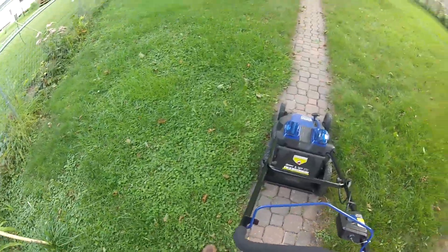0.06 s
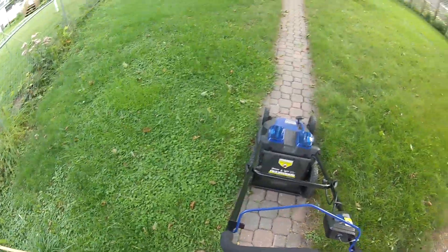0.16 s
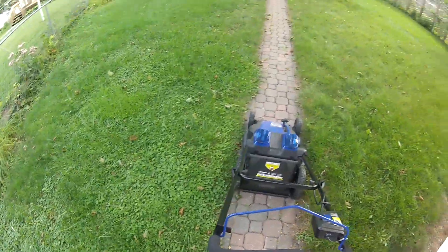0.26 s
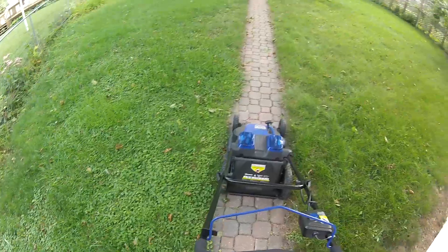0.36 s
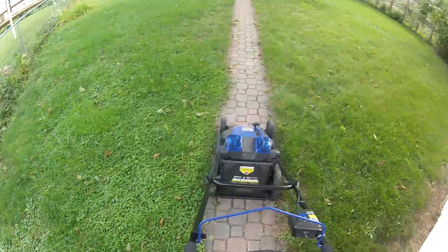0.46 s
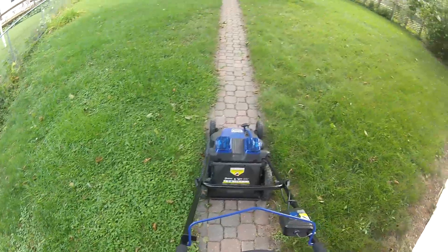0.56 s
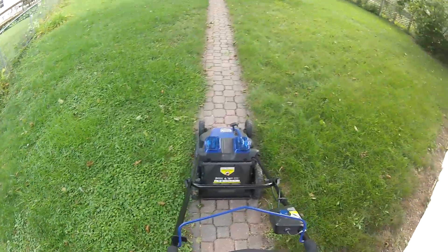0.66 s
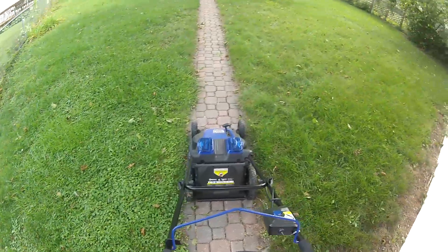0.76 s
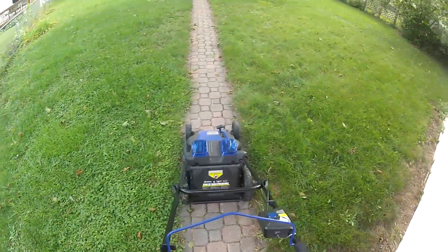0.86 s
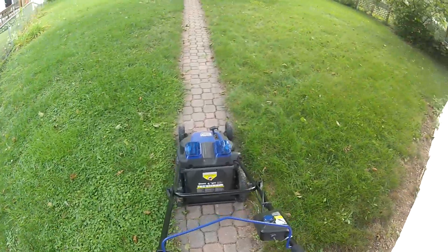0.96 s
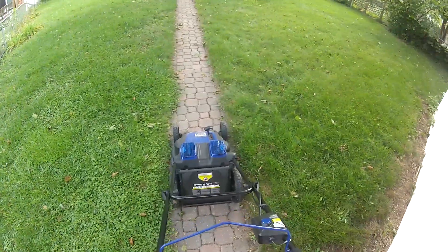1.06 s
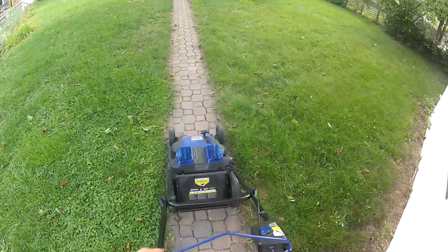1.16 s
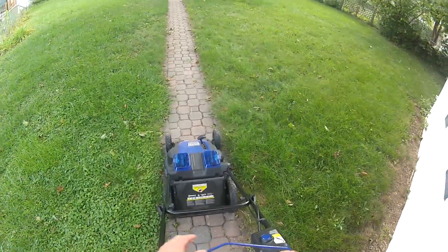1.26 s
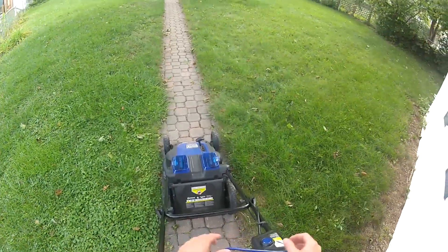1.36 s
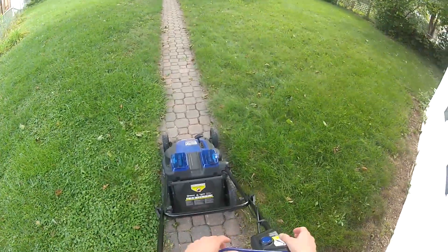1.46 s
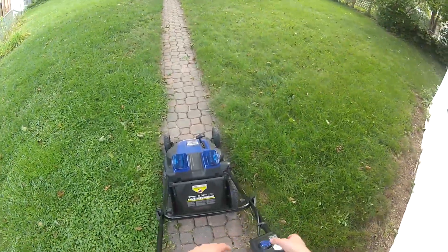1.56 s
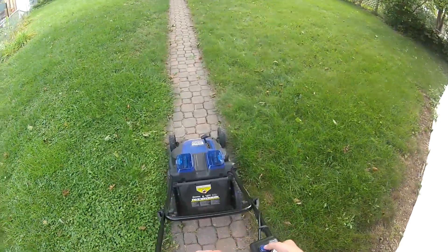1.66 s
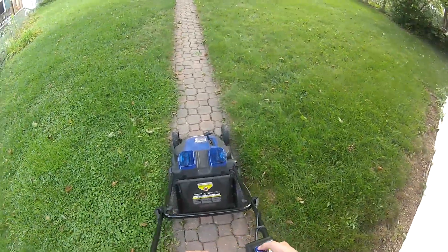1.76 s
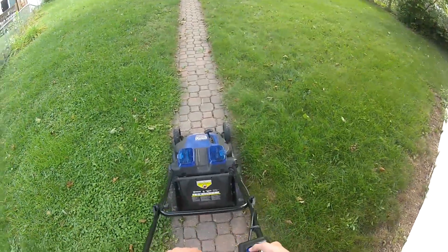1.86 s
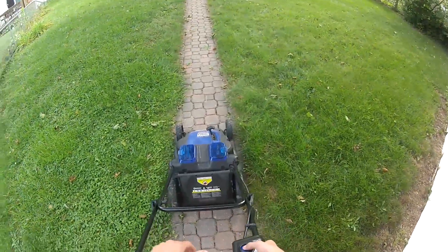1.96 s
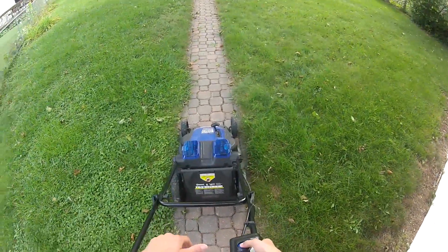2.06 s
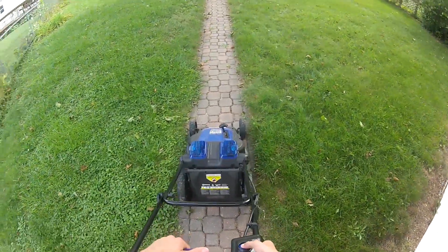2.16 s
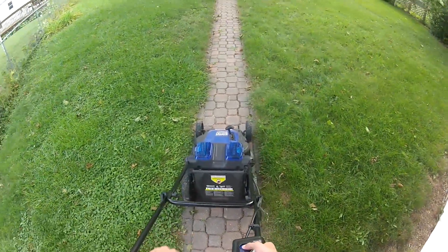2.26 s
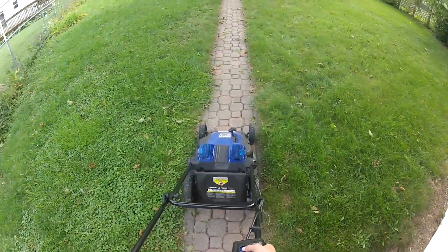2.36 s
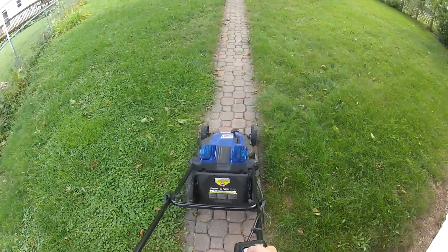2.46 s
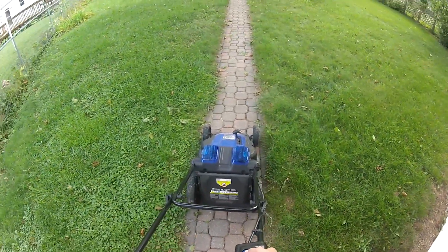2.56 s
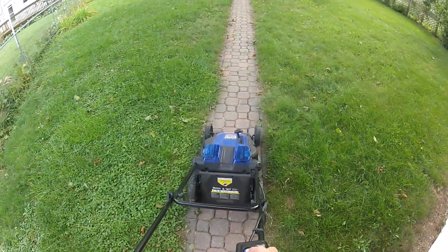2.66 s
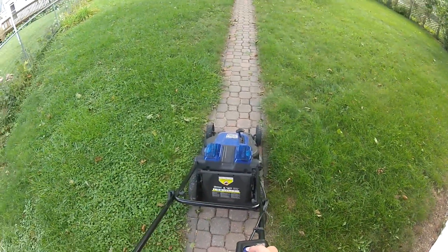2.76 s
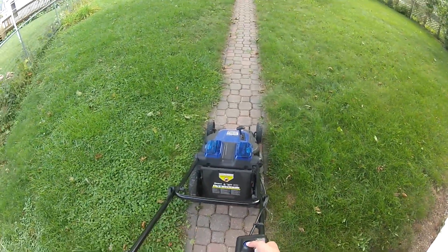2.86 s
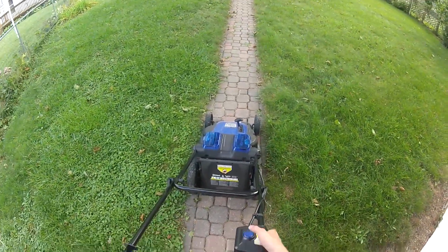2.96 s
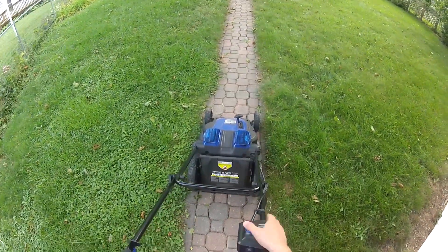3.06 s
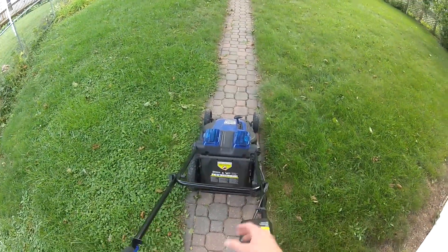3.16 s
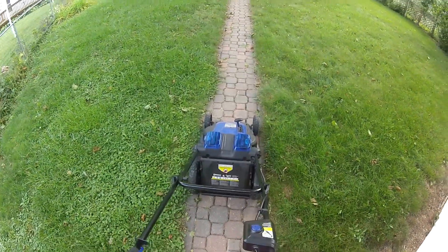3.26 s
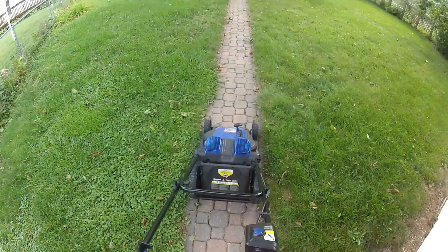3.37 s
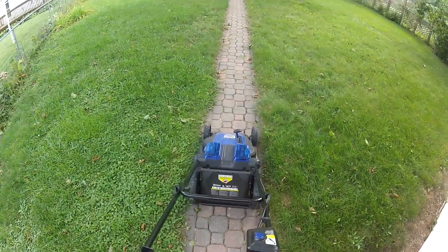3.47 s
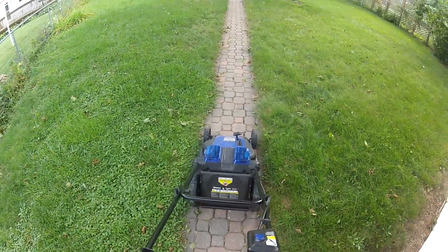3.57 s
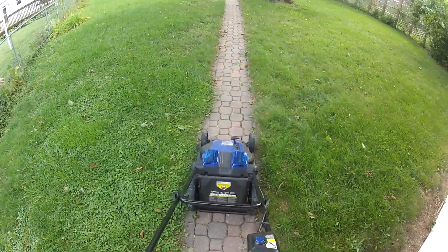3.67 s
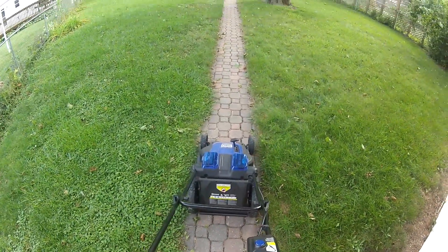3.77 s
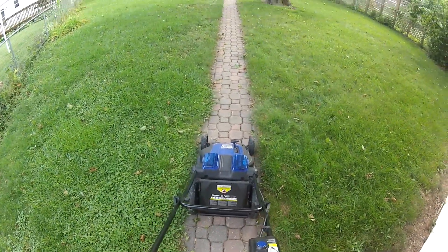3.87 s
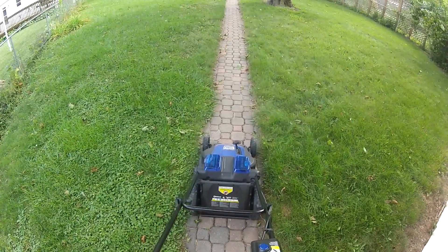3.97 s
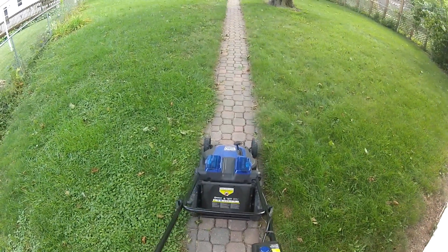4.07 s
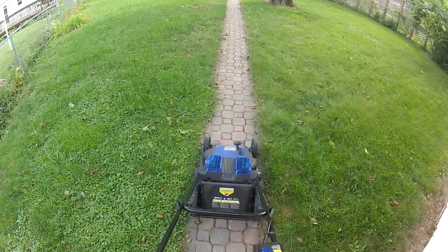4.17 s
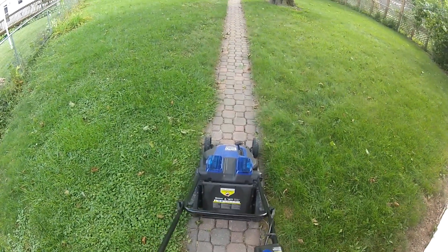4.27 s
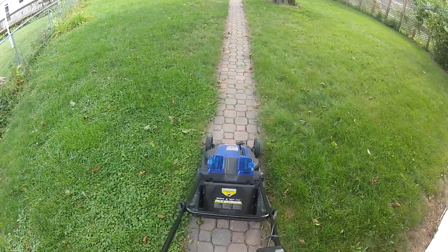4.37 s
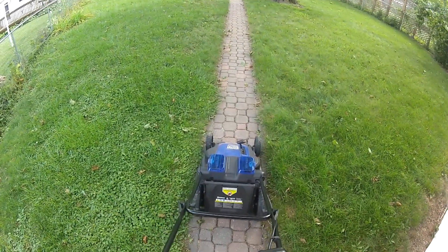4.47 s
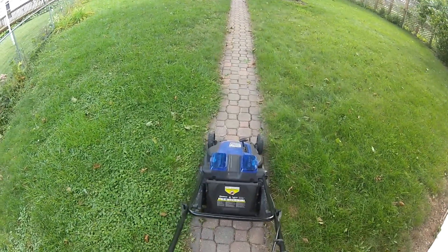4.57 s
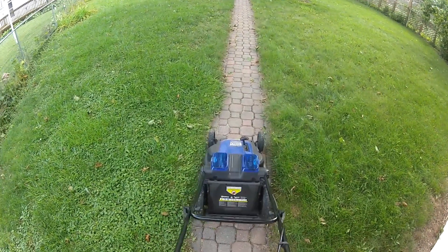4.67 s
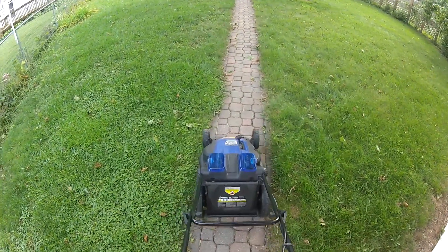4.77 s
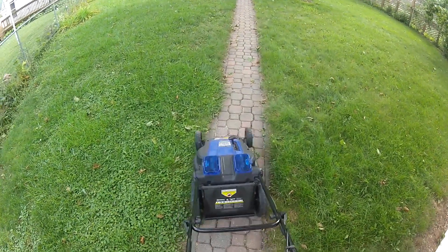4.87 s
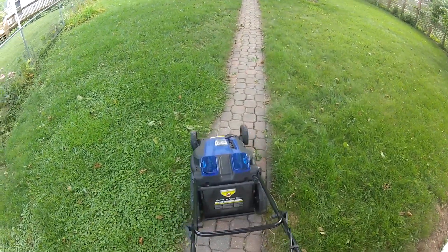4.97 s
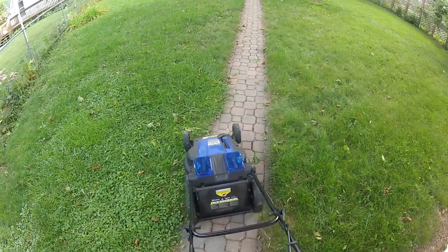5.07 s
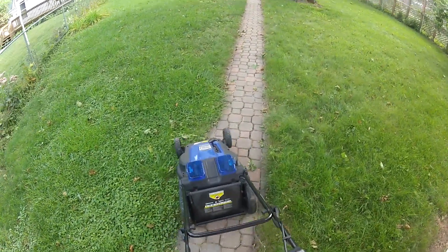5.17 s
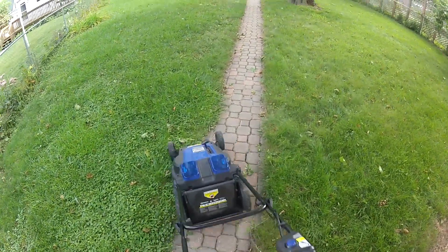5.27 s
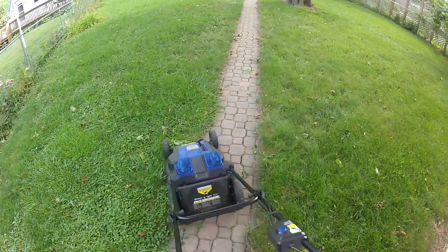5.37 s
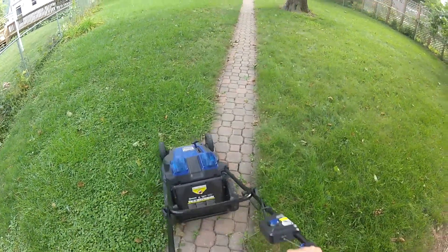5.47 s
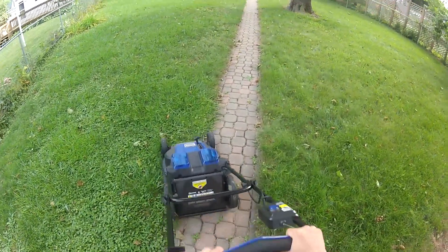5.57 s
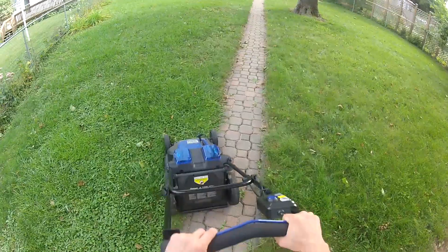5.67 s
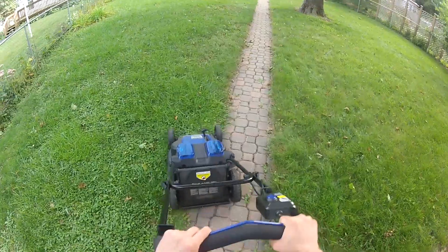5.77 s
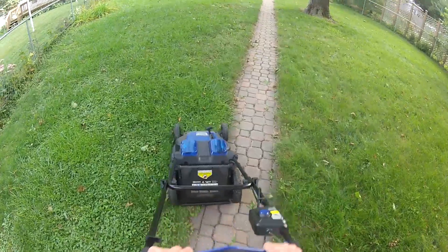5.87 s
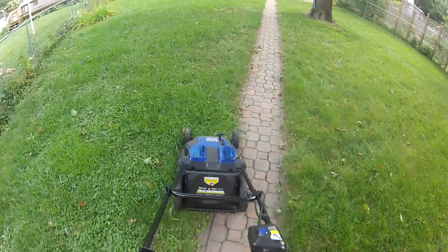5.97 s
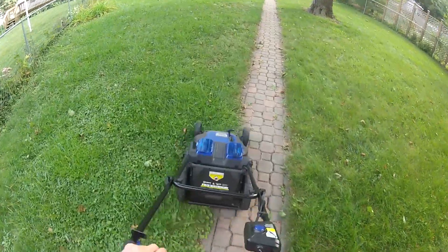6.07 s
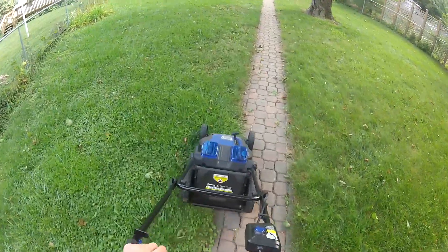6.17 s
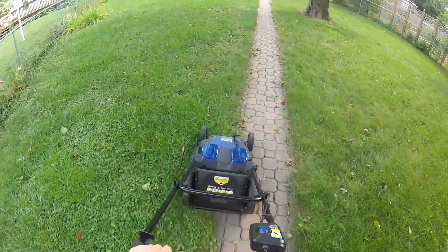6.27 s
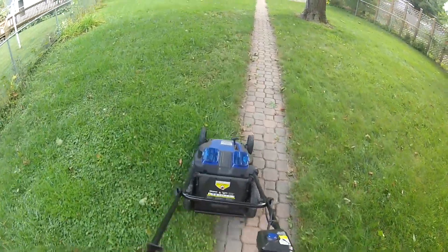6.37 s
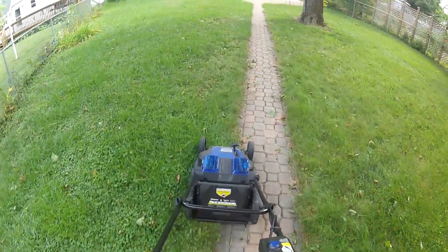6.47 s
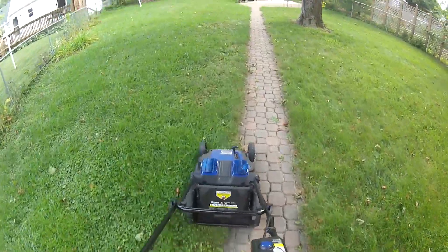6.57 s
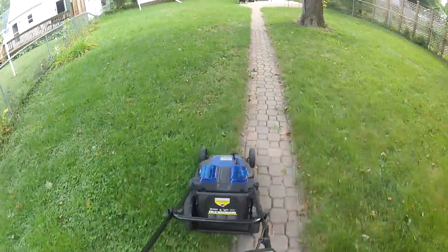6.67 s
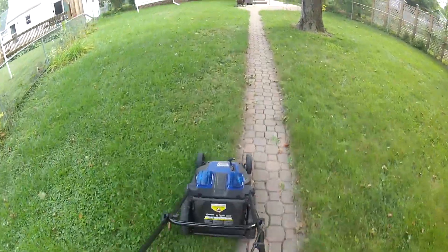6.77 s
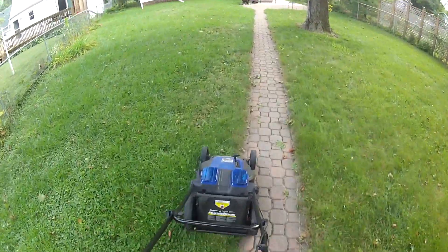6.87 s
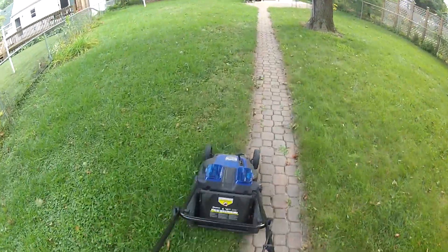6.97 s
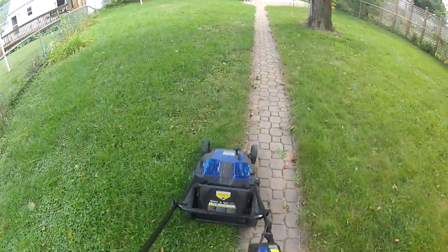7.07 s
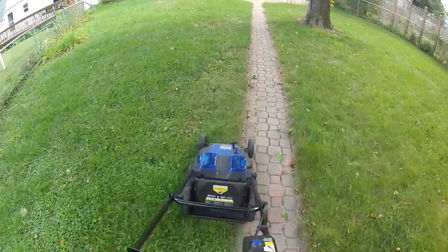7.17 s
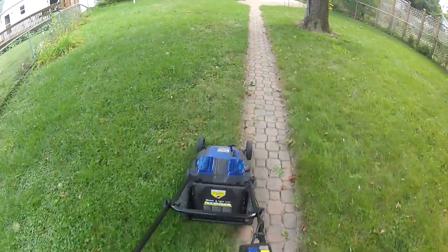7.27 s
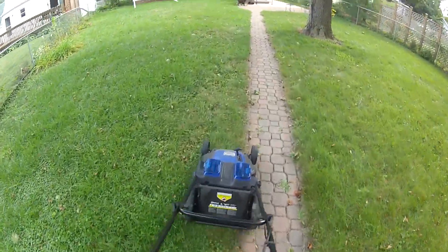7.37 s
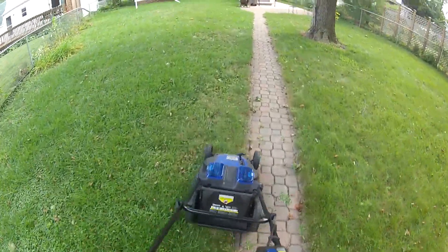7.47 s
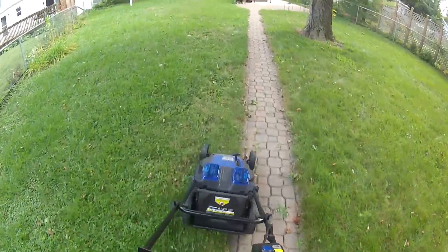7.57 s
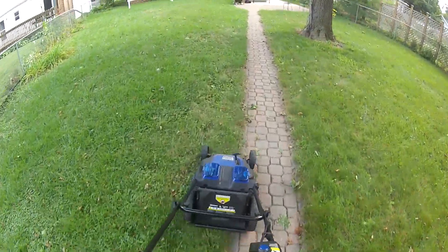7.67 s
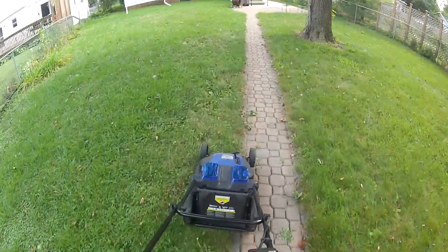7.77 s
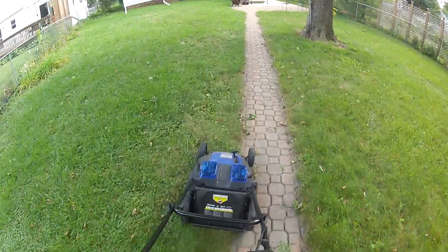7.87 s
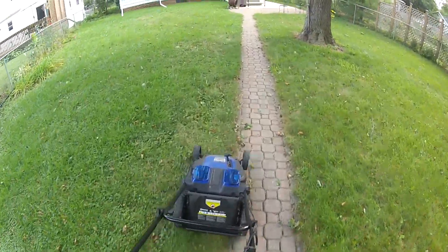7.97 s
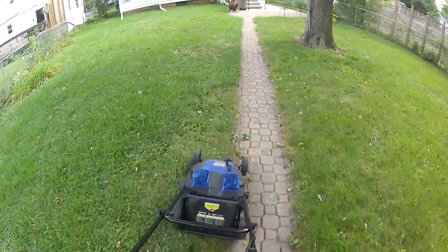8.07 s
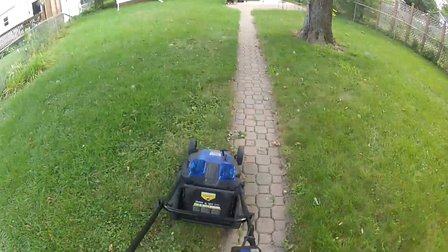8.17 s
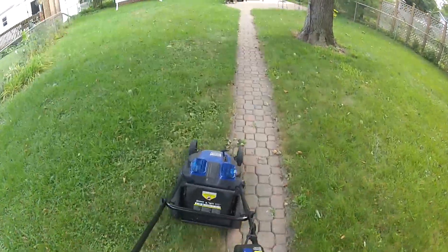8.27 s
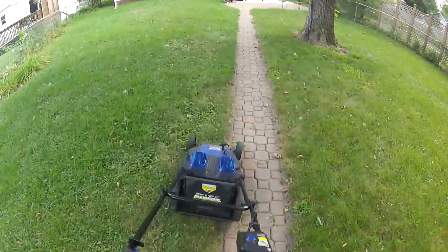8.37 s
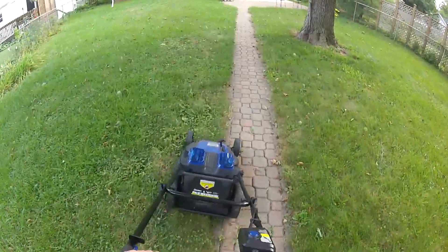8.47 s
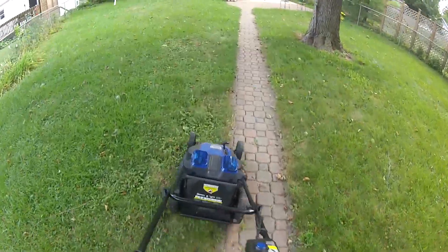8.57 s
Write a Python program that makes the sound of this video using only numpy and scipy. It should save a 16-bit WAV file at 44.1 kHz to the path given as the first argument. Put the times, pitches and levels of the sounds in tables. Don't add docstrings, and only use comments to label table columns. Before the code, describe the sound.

In a quiet yard with trilling insects, plastic clicks start an electric mower that whines up to a steady roar, then pushes into rattling grass.

```python
import sys
import numpy as np
from scipy import signal
from scipy.io import wavfile
from scipy.ndimage import uniform_filter1d

SR = 44100
rng = np.random.default_rng(int(sys.argv[2]) if len(sys.argv) > 2 else 0)


def waveform_to_disk(signal):
    frames = np.transpose(np.atleast_2d(signal))
    scaled = np.clip(frames, -1, 1) * 32767
    samples = np.round(scaled).astype(np.int16)
    wavfile.write(sys.argv[1], SR, samples)


def voltage_ratio(level):
    return 10 ** (np.asarray(level, float) / 20)


N = 380141
T = np.arange(N) / SR

# start_s, tip_pass_hz
SPEED = [(2.5, 5), (2.8, 36), (3.45, 104), (3.94, 158), (4.24, 185.5), (4.45, 190), (5.0, 194.5),
         (5.6, 195), (6.4, 192.5), (7.0, 189.5), (7.45, 190.5), (7.75, 185), (8.17, 168), (8.62, 162)]
# start_s, grass_depth (0-1)
GRASS = [(4.7, 0.0), (5.1, 0.2), (5.4, 0.54), (5.65, 0.5), (5.9, 0.64), (6.4, 0.53), (6.85, 0.76),
         (7.05, 0.63), (7.75, 0.85), (8.1, 0.74), (8.62, 0.93)]
# pitch_hz, left_minus_right_db
TILT = [(60, -1), (110, -4.5), (200, 2.5), (380, -4), (700, -0.5), (1290, -6), (2380, -7), (4400, -0.5),
        (8120, 4), (15000, -6)]
# pitch_hz, coherence (0-1)
SAME = [(60, 0.98), (130, 0.85), (290, 0.75), (640, 0.7), (1410, 0.75), (3100, 0.11), (6820, 0.15),
        (15000, 0.0)]
# pitch_hz, density_db
FIZZ = [(2500, -60), (5000, -8), (7600, 0), (9400, -9), (12000, -7), (15000, -3.5), (17000, -3.5)]


def blades():
    # start_s, tone_db, octave_db, second_blade_db
    coupling = [(3.5, -3, -4, 0), (3.62, -2, -2.5, 0), (3.75, -3, -1.5, 0), (3.93, 2, 1.5, -21),
                (4.15, -7, -4, 3.5), (4.3, -2, 0.5, 3), (4.77, 0, -0.5, -0.5), (5.2, -1.5, -1, 1),
                (5.6, 1.5, -4.5, 5.5), (6.0, 1.5, -8, -4), (6.2, -2, -5, 5.5), (6.37, -8.5, -2, 1),
                (6.6, -3.5, 3, 1.5), (6.85, -0.5, -3, -2), (7.1, -0.5, -5, -4), (7.6, -5.5, -3.5, 4),
                (7.8, 7, 0.5, -4), (7.92, -4.5, -6, 5.5), (8.2, 1.5, -4.5, 7), (8.62, -7, -2.5, -6)]
    # start_s, lag_hz, tone_share, octave_share
    twin_blade = [(3.5, 3.8, 0, .85), (4.0, 3.8, .1, .85), (4.2, 3.8, .7, .8), (4.75, 3.85, .55, .75),
                  (4.9, 4.5, .45, .65), (5.2, 4.8, .3, .7), (5.6, 5.6, .15, .6), (6.0, 6, .3, .7),
                  (6.6, 6.5, .3, .7), (7.0, 8.5, .35, .6), (7.7, 8, .35, .7), (8.62, 7.5, .5, .8)]
    # multiple of the tip-pass rate, level_db over the air roar
    orders = [(.5, -26), (3, -29), (4, -20), (5, -22), (6, -22), (7, -25), (10, -29), (11, -29)]
    # multiple of the twin blade's rate, level_db over the air roar
    whine = [(26.7, -39), (29.15, -35.5)]
    mate_ratio = 1.473
    octave_knee_hz, mate_knee_hz, knee_db = 128.5, 182, 324
    opposed_s = 4.48

    hz = speed()
    tone_db, twice_db, other_db = curves(coupling)
    octave_db = law("octave") + twice_db + knee_db * np.log10(np.minimum(hz / octave_knee_hz, 1))
    mate_db = law("mate") + other_db + knee_db * np.log10(np.minimum(hz / mate_knee_hz, 1))
    lag_hz, tone_share, octave_share = curves(twin_blade)
    slip = 2 * np.pi * np.cumsum(lag_hz) / SR
    slip = slip - slip[round(opposed_s * SR)] + np.pi

    loaded = curves(GRASS)[0]
    waver = .002 + .006 * loaded
    first = tone(hz, law("tone") + tone_db, waver, .6 + 2 * loaded, tone_share, slip)
    first += tone(2 * hz, octave_db + 1.5, waver, .6 + 1.5 * loaded, -octave_share, 2 * slip)
    orders_db = law("roar") + 60 * np.log10(hz / hz.max())
    for k, db in orders:
        first += tone(k * hz, orders_db + db, .006 / np.sqrt(k), 4)
    muffling_db = 40 * np.maximum(loaded - .55, 0)
    for k, db in whine:
        first += tone(k * (hz - lag_hz), orders_db + db - muffling_db, .001, 3)

    mate_hz = mate_ratio * hz
    second = tone(mate_hz, mate_db - 1.5, .022, 3.0)
    second += tone(2 * mate_hz, law("mate_octave") - 2, .011, 2.5)
    second += tone(1.94 * mate_hz, law("mate_octave") - 3.5, .025, 2.5)
    return first + second


def air():
    # pitch_hz, density_db
    roar_shape = [(110, -35), (170, -20.5), (320, 1.5), (470, -10), (700, -2), (1000, -0.5), (1200, 1.5),
                  (1600, -4.5), (2050, -17), (2550, -44), (2950, -20), (3500, -23), (4500, -27),
                  (6000, -65)]
    hiss_shape = [(1100, -24), (1700, 6), (2200, 3.5), (2650, 1.5), (3200, -7), (5400, -8.5), (7400, -12),
                  (9400, -24.5), (12000, -27), (16500, -37)]
    # pitch_hz, density_db
    rumble_shape = [(40, -40), (70, -5), (130, 14), (300, 7), (600, -41)]
    # pitch_hz, width_hz, level_db
    deck_modes = [(400, 260, -8), (700, 120, -2), (830, 60, -5), (1270, 50, -7)]
    # pitch_hz, width_hz, level_db
    shroud_modes = [(834, 50, -5), (1275, 70, 0), (1550, 40, -7), (2090, 80, -7), (2620, 90, -13)]
    # pitch_hz, width_hz, level_db
    cavity_modes = [(802, 175, 1.5), (1172, 120, 4.5), (1335, 290, -1.5)]
    # start_s, roar_db, cavity_db, cavity_pitch_factor
    rocking = [(3.0, -0.5, 0, 0.87), (3.5, 0, 0, 1.1), (4.0, 0.5, 0, 1.1), (4.4, 0, -6, 1.13),
               (4.8, 0.5, 0, 0.96), (5.12, .5, 2, 1.04), (5.5, 0, -2, 0.98), (5.85, 0.5, 1, 1.03),
               (6.1, 0.5, 2, 1), (6.35, 1.5, 3, 1), (6.6, 0, 4, 0.97), (6.85, 0.5, -3, 0.95),
               (7.07, -1.5, 4, 0.99), (7.4, 0, 1, 0.94), (7.75, 0, -4, 1), (8.05, -0.5, 2, 0.95),
               (8.3, 0, -1, 1.04), (8.62, 0.5, 2, 1.04)]
    # start_s, length_s, level_db
    sprays = [
        (5.79, 0.23, -48),
        (6.845, 0.12, -34),
        (8.51, 0.097, -52),
    ]
    # start_s, length_s, level_db
    controller = (2.75, .72, -74)

    roar_db, hiss_db, fizz_db, rumble_db = map(law, ("roar", "hiss", "fizz", "rumble"))
    chop = 1 + 0.11 * (1 + .5 * slow(2.9)) * np.cos(2 * np.pi * np.cumsum(speed()) / SR)
    gust_db = slow(36.0)
    open_db, hollow_db, shift = curves(rocking)
    roar = voltage_ratio(roar_db + open_db - 3.0 + 0.68 * gust_db) * chop * noise(roar_shape, SAME, 1.84, size=512)
    hiss = voltage_ratio(hiss_db + 5.5 + 0.86 * gust_db) * chop * noise(hiss_shape, SAME, 0.93)

    grain_db = 2 * slow(60) + 1.2 * slow(300)
    fizz_level = voltage_ratio(fizz_db + 8.0 + grain_db) + sum(spell(*row) for row in sprays)
    fizz = fizz_level * noise(FIZZ, SAME, 1.2, size=256)
    rumble = voltage_ratio(rumble_db + 1.5 + 1.0 * slow(8)) * noise(rumble_shape, SAME, 2.5, size=2048)

    rings = voltage_ratio(law("deck")) * modes(deck_modes) + voltage_ratio(law("shroud")) * modes(shroud_modes)
    rings += voltage_ratio(law("cavity") + hollow_db + 1.1 * slow(5.3)) * modes(cavity_modes, shift)
    whistle = tone(10030 + 0 * T, 0, .002, 2.6) * spell(*controller)
    return ground(roar + hiss) * gate(SPEED) + fizz + rumble + pan(rings, -5.0) + whistle


def speed():
    return uniform_filter1d(curves(SPEED)[0], size=SR // 8)


def law(layer):
    # full_speed_db, rise_db per decade of speed, slow_fall_db, deep_grass_db, swung_aside_db
    laws = dict(tone=(-22.5, 131, 0, -1.5, -1), octave=(-24.5, 28, -12, -2, 4.5),
            mate=(-26.5, 32, 0, -2.5, -7.5), mate_octave=(-31.5, 60, 1, -0.5, 0.5),
            roar=(-16.5, 35.5, 56, -2, 0.9), hiss=(-29.5, 81, -45, -1.5, -2.5),
            fizz=(-50.5, 58, -3, 14, -4), rumble=(-53, 2, 6.5, 23.5, -2.5), deck=(-34.5, 15, 16, 8, -25),
            shroud=(-27.5, 28, 62, -29, -12), cavity=(-36, 62, 0, 0, 10))
    # start_s, turn (0-1)
    swing = [
        (5.05, 0.0),
        (5.55, 1),
        (6.0, 0.78),
        (6.3, 0.4),
    ]
    full_db, rise_db, stall_db, grass_db, swing_db = laws[layer]
    slack = np.log10(speed() / 195)
    speed_db = full_db + rise_db * slack - stall_db * slack ** 2
    return speed_db + grass_db * curves(GRASS)[0] + swing_db * curves(swing)[0]


def ground(x):
    delay_s, drift, share = .003, 0.101, 0.11
    late = T - delay_s * (1 + drift * slow(1.08))
    echo = np.array([np.interp(late, T, c) for c in x])
    return (x + share * echo) / np.sqrt(1 + share ** 2)


def modes(table, shift=1):
    shake = rng.standard_normal(N)
    total = 0
    for hz, width, db in table:
        total = total + voltage_ratio(db) * resonate(resonate(shake, hz * shift, width), hz * shift, width)
    return evened(total)


def grit():
    # start_s, peak_db, left_minus_right_db
    bits = [(3.907, -19, -1), (4.9172, -8.5, 1), (5.2493, -23, 3), (5.33, -14, 7), (5.8123, -12.5, 2),
            (5.9123, -16, 0.5), (6.068, -16, 1), (6.638, -11.5, 0), (6.703, -16.5, -3), (6.8759, -25, 0.0),
            (6.885, -9, -3), (6.9103, -10, 3), (7.0225, -13, 3), (7.1282, -15, -3), (7.2057, -21, 9),
            (7.302, -10, -2), (7.56, -31, -5), (7.7503, -15, 3), (7.7719, -8, 0.0), (7.8367, -14.5, -3),
            (7.929, -13.5, 4), (8.1048, -19, -1), (8.199, -24, 5), (8.201, -13, -6), (8.2078, -14.5, 9),
            (8.356, -20, 6), (8.532, -9, -2), (8.604, -12.5, 3)]
    # start_s, peak_db, left_minus_right_db
    flecks = [(4.9482, -22, 0), (5.036, -26, -0.5), (5.4375, -23, 1.5), (5.7623, -31, -0.5),
              (5.8606, -27, 1.5), (5.8915, -24, -0.5), (5.9559, -22, -5), (6.125, -28, 0.5),
              (6.1439, -22, 1.0), (6.2457, -28, -3.0), (6.4048, -24, 2), (6.473, -26, -1.5),
              (6.6897, -31.5, -2.5), (6.798, -28, -2.5), (7.0025, -26, 1.5), (7.0469, -17, 0.5),
              (7.2503, -27, -1.0), (7.3154, -20, -12), (7.4889, -30, 1.0), (7.539, -30, -2.5),
              (7.636, -22, 0.0), (7.7034, -26, -1.0), (7.7189, -23, -2.5), (7.9603, -23, -3.5),
              (8.1404, -26, -2.5), (8.2314, -22, -5), (8.2591, -27, -2.0), (8.3684, -23, -1.0),
              (8.4108, -31, -5), (8.4507, -35, -1.0), (8.5744, -24, -0.5), (6.582, -23, 0), (6.61, -28, 0),
              (6.653, -22, 0), (6.736, -23, 0), (6.754, -21, 0), (6.927, -22, 0), (8.18, -25, 0),
              (8.195, -24, 0), (8.324, -28, 0), (8.375, -23, 0), (8.552, -25, 0), (8.609, -22, 0)]
    t60 = 0.04
    mix = np.zeros((2, N))
    for s, db, side_db in bits:
        spit = .7 * burst(0.2 * t60, 0.0002, 4500, 8600, channels=2)
        spit += .6 * burst(0.2 * t60, 0.0002, 12000, 17000, channels=2)
        smear = .22 * burst(.055, .002, 3000, 18000, channels=2)
        knock = voltage_ratio(-6) * burst(.4 * t60, 0.00022, 2000, 7700)
        add(mix, s, voltage_ratio(db + 9.5) * pan(0.42, side_db)[:, None] * (spit + smear + knock))
    for s, db, side_db in flecks:
        tick = 0.55 * burst(0.28 * t60, .0003, 5100, 8600, channels=2)
        tick += .8 * burst(0.25 * t60, .0003, 11500, 18000, channels=2)
        add(mix, s, voltage_ratio(db + 7.0) * pan(1.0, side_db)[:, None] * tick)
    return mix


def clicks():
    # start_s, peak_db, ring_hz, treble_db, thud_db
    snaps = [(1.696, -37.5, 1103, -14, -11), (1.7223, -32, 2094, -21, -24), (1.901, -37, 1585, -24, -31),
             (1.9173, -16.5, 1440, -20.5, -23), (1.9188, -20, 2240, -20, -28),
             (2.2914, -22.5, 2860, -22, -20), (2.306, -27, 2190, -22, -22), (2.3119, -20, 1710, -21, -29),
             (2.3192, -28, 2000, -25, -18), (2.33, -37.5, 1560, -5, -7), (2.433, -25, 2140, -12, -26),
             (2.4347, -7.5, 3040, -9.5, -22), (2.44, -13, 1610, -18, -24), (2.4462, -16.5, 800, -25, -23),
             (2.512, -16, 3750, 3, -31), (2.513, -9.5, 2700, -10, -24), (2.516, -18, 2830, -14, -30),
             (2.524, -22, 2720, -12, -24), (2.9858, -20, 1990, -22, -23), (2.9998, -11.5, 1490, -18, -30),
             (3.0011, -18.5, 2080, -28, -30), (3.231, -28, 2100, -14, -11), (3.29, -14, 1590, -7, -21),
             (3.2924, -19, 870, -13, -19), (3.298, -21, 1800, -8, -24), (3.326, -31, 1400, -5, -8),
             (3.348, -34, 3000, -4, -8), (2.275, -40, 3940, -15, -18)]
    # start_s, peak_db, pitch_hz
    bumps = [
        (1.52, -39, 71.7),
        (1.591, -31, 60),
        (1.721, -34, 59.3),
        (3.33, -33, 169.3),
        (5.42, -42, 119),
        (6.196, -9, 124.1),
        (6.842, -20, 130),
        (7.744, -10, 200),
    ]
    # start_s, peak_db, lowest_hz, t60_s
    edges = [
        (1.919, -27, 3800, .03),
        (2.2915, -36, 4000, .015),
        (2.4338, -20, 13000, .02),
        (2.4343, -2.5, 12400, 0.013),
        (2.4352, -5.5, 7100, 0.011),
        (2.5128, -29, 12500, 0.053),
        (2.9995, -25, 7460, .012),
    ]
    # start_s, peak_db
    scuffs = [(3.471, -29), (3.478, -29), (3.494, -24.5), (3.553, -31), (3.562, -26)]
    t60, side_db = 0.076, -5.5
    mix = np.zeros((2, N))
    for s, db, hz, treble_db, thud_db in snaps:
        crack = burst(0.5 * t60, 0.00016, 910, 2560)[0]
        impulse = np.eye(1, len(crack))[0]
        ring = 0
        for k, share in [(0.964, 0.44), (1.08, 0.25), (1.52, 0.1)]:
            ring = ring + share * resonate(resonate(impulse, hz * k, 940), hz * k, 210)
        tail = 0.35 * burst(1.18 * t60, 0.0015, 0.7 * hz, 1.6 * hz, channels=2)
        body = .3 * crack + 0.97 * ring / abs(ring).max() + tail
        treble = burst(0.23 * t60, 0.00015, 5900, 9400, channels=2) * pan(1, 11.5)[:, None]
        treble += burst(0.094 * t60, 0.00022, 12000, 15000, channels=2)
        treble += 0.42 * burst(0.9 * t60, 0.0011, 2800, 8700, channels=2)
        thud = burst(1.15 * t60, 0.027, 235, 550)
        click = body + voltage_ratio(treble_db + 6.5) * treble + voltage_ratio(thud_db + 21.0) * thud
        add(mix, s, voltage_ratio(db) * pan(0.85, side_db)[:, None] * click)
    for s, db, hz in bumps:
        add(mix, s - .02, voltage_ratio(db) * burst(0.17, 0.008, 0.74 * hz, 2.54 * hz) * np.ones((2, 1)))
    for s, db, hz, ring_t60 in edges:
        edge = burst(ring_t60, 0.00034, hz, 1.2 * hz, channels=2)
        add(mix, s, voltage_ratio(db) * pan(1, side_db)[:, None] * edge)
    for s, db in scuffs:
        add(mix, s, voltage_ratio(db) * burst(0.055, 0.0011, 4170, 14000, channels=2))
    return mix


def katydids():
    # pitch_hz, width_hz, level_db
    chorus = [(7600, 300, -63.5), (6900, 400, -72)]
    # start_s, length_s, pitch_hz, level_db
    trills = [(.05, .11, 13300, -71), (.1, .14, 6900, -63), (.27, .23, 7780, -60), (.27, .1, 15200, -72),
              (.56, .08, 6900, -63), (.89, .11, 6900, -62), (1.0, .07, 8250, -64), (1.06, .25, 7850, -57.5),
              (1.33, .13, 6850, -61), (1.63, .19, 6900, -58), (2.12, .15, 6900, -67), (2.36, .2, 7800, -63),
              (2.68, .18, 6900, -63), (2.66, .16, 13600, -76), (2.86, .33, 7800, -58.5),
              (3.16, .12, 6900, -63)]
    low_singer_hz = 7200
    mix = np.zeros((2, N))
    for hz, width, db in chorus:
        far = rng.standard_normal((2, N))
        band = evened(np.array([resonate(resonate(c, hz, width), hz, width) for c in far]))
        mix += voltage_ratio(db + 1.7 * slow(11)) * band
    for s, length, hz, db in trills:
        strokes_hz = 70 if hz < low_singer_hz else 94
        t = np.arange(round(length * SR)) / SR
        glide = 1 - .035 * (hz > low_singer_hz) * np.exp(-t / .03) - .01 * np.exp(-t / .05)
        wing = np.cos(2 * np.pi * hz * np.cumsum(glide) / SR)
        scrape = evened(uniform_filter1d(rng.standard_normal(SR // 2), size=60))[:len(t)]
        puffs = np.sin(np.pi * strokes_hz * t) ** 2 * (1 + .7 * scrape * (hz / 9000) ** 2)
        trill = evened(puffs * wing) * signal.windows.tukey(len(t), .3)
        add(mix, s, pan(voltage_ratio(db + 3.5) * trill, 0))
    return mix


def wind():
    # start_s, level_db
    breeze = [(0.0, -49), (1.03, -55), (1.7, -43.5), (2.13, -54.5), (4.4, -60), (6.1, -62), (6.82, -32.5),
              (7.06, -43), (7.2, -34.5), (7.55, -42), (7.7, -33), (8.5, -47), (8.62, -30)]
    # pitch_hz, density_db
    gust = [(18, -50), (32, -17), (50, -4), (80, -14.5), (120, -9.5), (200, -85)]
    lumps = noise(gust, [(30, .3), (100, .6)], 2.5, size=4096, placed=False)
    return voltage_ratio(curves(breeze)[0] + 1.5) * pan(1, 5.0)[:, None] * lumps


def yard():
    # start_s, firing_hz, level_db
    drone = [(0.0, 93.4, -47), (.13, 95, -35.5), (.28, 95.8, -38), (.39, 95.3, -46), (.48, 96.6, -39),
             (0.66, 97, -40), (0.87, 98.9, -57), (1.0, 100, -40), (1.28, 101.5, -43), (1.4, 102.2, -51),
             (1.55, 102.4, -47), (2.0, 102, -54), (2.27, 100.5, -44.5), (2.7, 99, -49.5), (3.2, 97, -48),
             (3.4, 96.7, -37.5), (3.6, 92.4, -56), (3.75, 91, -37), (4.15, 89.5, -39), (4.5, 86.6, -45.5),
             (4.75, 83, -41), (5.15, 76.3, -37.5), (5.35, 74, -44), (6.18, 59.4, -43), (6.4, 53.8, -55),
             (6.7, 44.2, -60)]
    # start_s, level_db
    hum = [(0, -59), (2.5, -57), (4.5, -52), (8.62, -70)]
    # pitch_hz, density_db
    wash = [(74, -25), (125, -18), (156, -10), (216, -11), (447, -11), (756, -15.5), (925, -14.5),
            (2210, -18), (4300, -27.5), (7430, -18.5), (8300, -25), (9090, -39), (10300, -35), (15700, -40)]
    # pitch_hz, coherence (-1 to 1)
    wash_same = [(60, 0.081), (240, 0.64), (950, -0.29), (3770, 0.028), (15000, -0.22)]
    # start_s, length_s, level_db
    sleeve = (0.83, .33, -55.5)
    # start_s, length_s, pitch_hz, level_db
    coos = [
        (.46, 0.086, 647, -51.5),
        (1.02, 0.14, 615, -54),
        (1.1, .08, 823, -54),
        (1.36, 0.089, 473, -53),
    ]
    mix = voltage_ratio(-46.5 + .5 * slow(0.95)) * noise(wash, wash_same, 0.83, size=2048, placed=False)
    hz, db = curves(drone)
    hz = uniform_filter1d(hz, size=SR // 4)
    mix += tone(hz, np.minimum(db, -35), .006, 1.6) * gate(drone)
    mix += tone(60 + 0 * T, curves(hum)[0], 0.027, 2.2)
    cloth = noise(FIZZ, wash_same, 3.5, size=256, placed=False)
    mix += spell(*sleeve) * voltage_ratio(2.3 * slow(60)) * cloth
    for s, length, coo_hz, coo_db in coos:
        t = np.arange(round(length * SR)) / SR
        coo = np.hanning(len(t)) * np.sin(2 * np.pi * coo_hz * t)
        add(mix, s, pan(voltage_ratio(coo_db + 2.0) * coo, 0))
    return mix


def tone(hz, db, waver, flutter_db, twin=0, slip=0):
    phase = 2 * np.pi * np.cumsum(hz * (1 + waver * slow(10.87))) / SR
    pair = (np.sin(phase) + twin * np.sin(phase - slip)) / np.sqrt(1 + twin ** 2)
    return pan(np.sqrt(2) * voltage_ratio(db + flutter_db * slow(10.0)) * pair, read(TILT, hz))


def noise(shape, same, patchy_db, size=1024, placed=True):
    # pitch_hz, lead_rad
    lead = [(0, -0.1), (1460, 0.52), (2840, 2.5), (5600, 1.34)]
    frames, hz = 4 * N // size + 9, np.fft.rfftfreq(size, 1 / SR)
    a, b, c, d, patches = rng.standard_normal((frames, len(hz), 5)).T
    patches = uniform_filter1d(patches, size // 80, 0)
    patches = evened(uniform_filter1d(patches, 10240 // size, 1))
    like = np.clip(read(same, hz), -1, 1)[:, None]
    left = a + 1j * b
    z = np.array([left, like * left + np.sqrt(1 - like ** 2) * (c + 1j * d)])
    port = (voltage_ratio(read(TILT, hz) / 2) * np.exp(.5j * read(lead, hz)))[:, None] ** placed
    z *= np.array([port, 1 / port]) * voltage_ratio(read(shape, hz)[:, None] + patchy_db * patches)
    return evened(signal.istft(z, nperseg=size, noverlap=3 * size // 4)[1][:, size:size + N])


def burst(t60, rise, lo_hz, hi_hz, channels=1):
    t = np.arange(SR // 5) / SR
    band = signal.butter(2, [lo_hz, min(hi_hz, 20000)], "bandpass", fs=SR, output="sos")
    x = signal.sosfilt(band, rng.standard_normal((channels, len(t))))
    return x / x.std() * (1 - np.exp(-t / rise)) * voltage_ratio(-60 * t / max(t60, .004)) * .5


def resonate(x, hz, width):
    turn = np.exp(2j * np.pi * np.cumsum(hz * np.ones(len(x))) / SR)
    r = np.exp(-np.pi * width / SR)
    return 2 * (turn * signal.lfilter([1 - r], [1, -r], x / turn)).real


def slow(hz):
    rate = 800
    steps = rng.standard_normal(int((N / SR + 2) * rate))
    smooth = signal.sosfiltfilt(signal.butter(2, min(hz, 300), fs=rate, output="sos"), steps)
    return evened(np.interp(T + 1, np.arange(len(steps)) / rate, smooth))


def spell(start, length, db):
    return voltage_ratio(db) * np.clip(np.minimum(T - start, start + length - T) / (.25 * length), 0, 1)


def gate(rows, fade=.08):
    opening = np.clip((T - rows[0][0]) / fade + 1, 0, 1)
    return opening * np.clip((rows[-1][0] + fade - T) / fade, 0, 1)


def evened(x):
    return x / np.sqrt(np.mean(x ** 2) + 1e-20)


def read(points, hz):
    f, value = np.transpose(points)
    return np.interp(np.log(hz + 1), np.log(f + 1), value)


def curves(rows):
    s, *columns = np.transpose(rows)
    return [np.interp(T, s, c) for c in columns]


def pan(x, db):
    return np.array([x * voltage_ratio(db / 2), x * voltage_ratio(-db / 2)])


def add(mix, s, sound):
    part = mix[:, round(s * SR):][:, :sound.shape[1]]
    part += sound[:, :part.shape[1]]


def scene():
    return blades() + air() + grit() + clicks() + katydids() + wind() + yard()


def low_pass(x):
    return signal.sosfilt(signal.butter(12, 16850, fs=SR, output="sos"), x)


def record(dry):
    held = np.clip(dry, -1, 1)
    lowpass = signal.firwin(511, 15790, window=("kaiser", 9), fs=SR)
    limited = signal.oaconvolve(held, lowpass[None], "same")
    return low_pass(limited + voltage_ratio(-48) * (held - limited))


dry = scene()
out = record(dry)
waveform_to_disk(out)
```